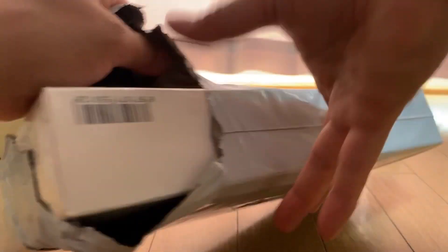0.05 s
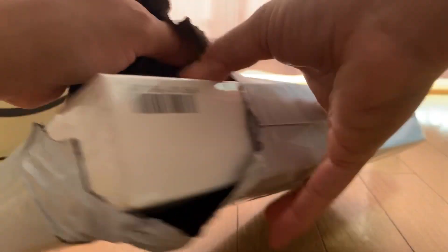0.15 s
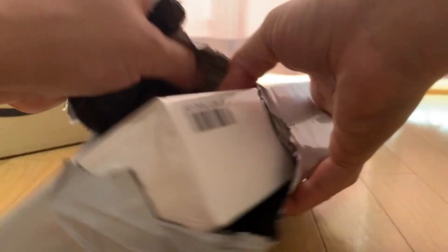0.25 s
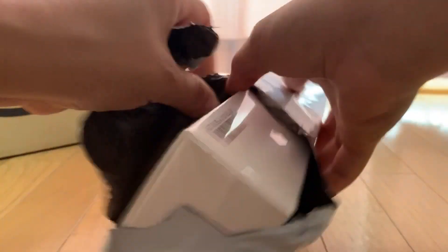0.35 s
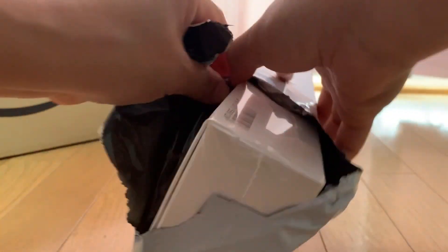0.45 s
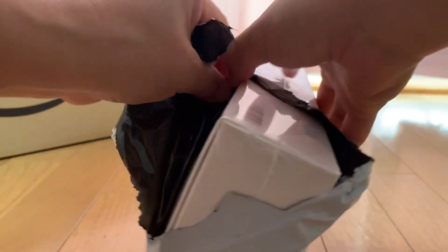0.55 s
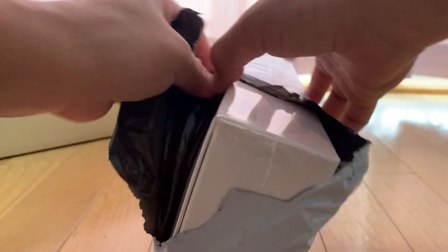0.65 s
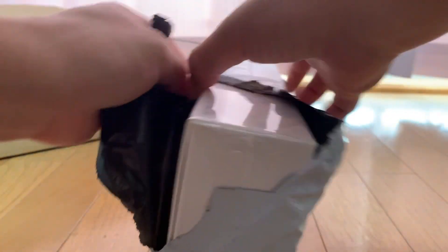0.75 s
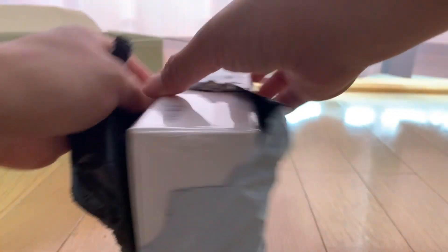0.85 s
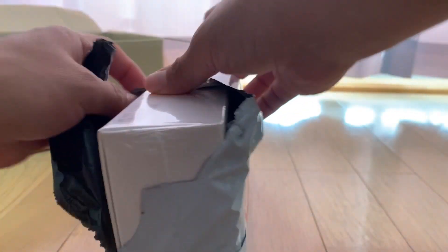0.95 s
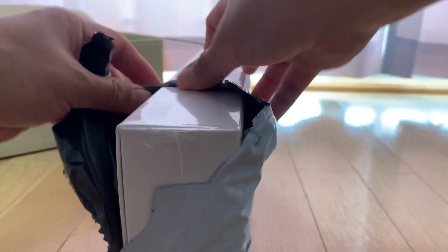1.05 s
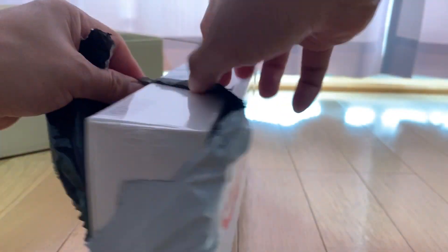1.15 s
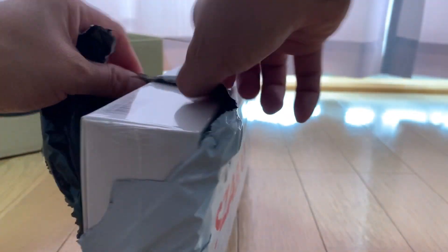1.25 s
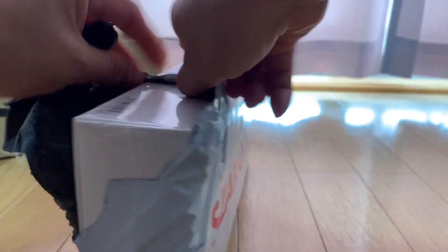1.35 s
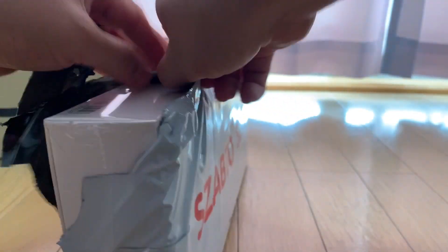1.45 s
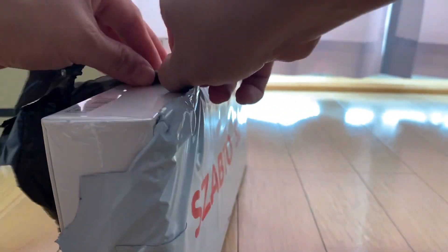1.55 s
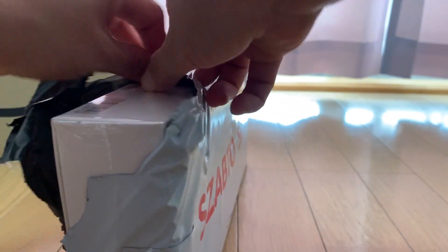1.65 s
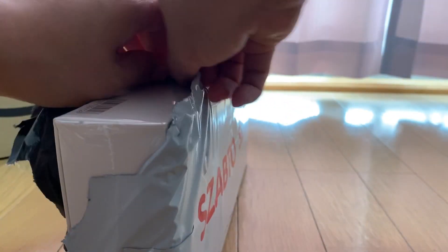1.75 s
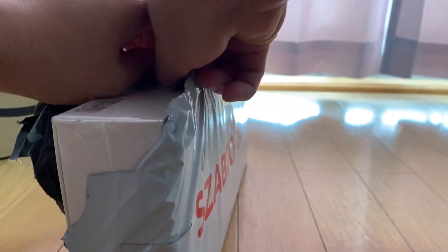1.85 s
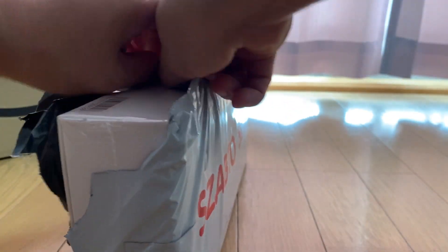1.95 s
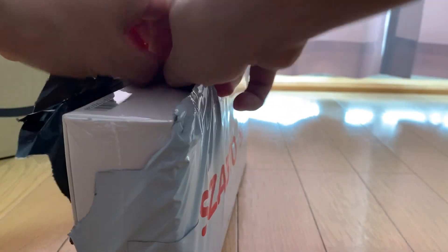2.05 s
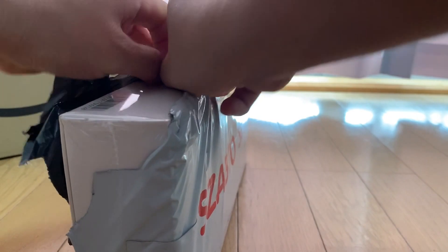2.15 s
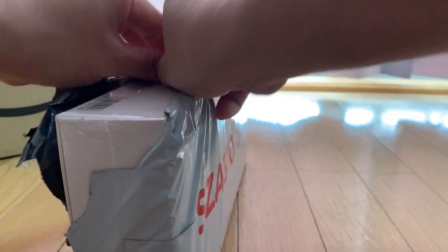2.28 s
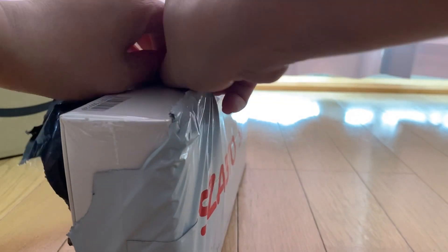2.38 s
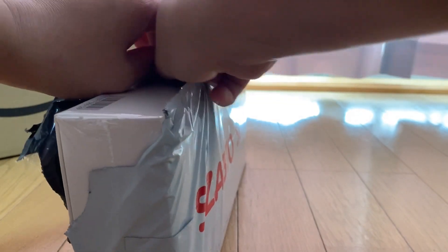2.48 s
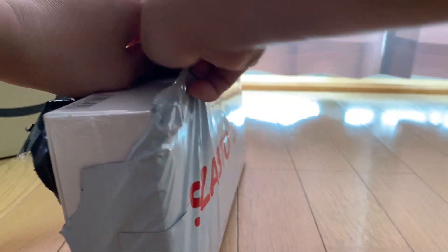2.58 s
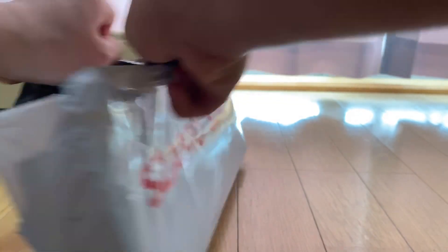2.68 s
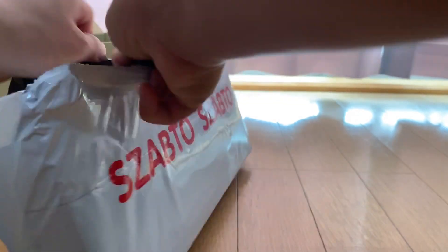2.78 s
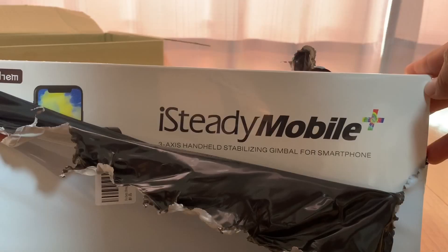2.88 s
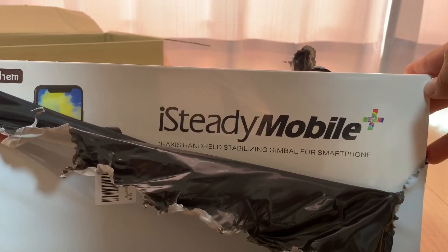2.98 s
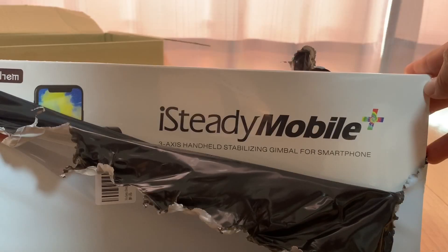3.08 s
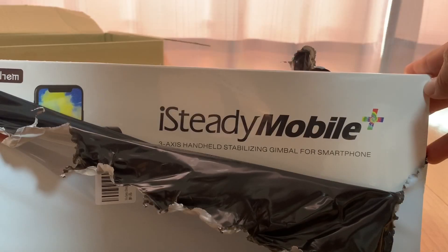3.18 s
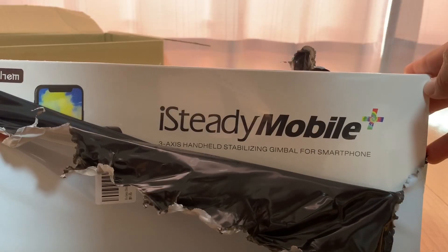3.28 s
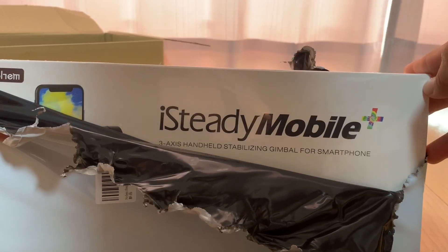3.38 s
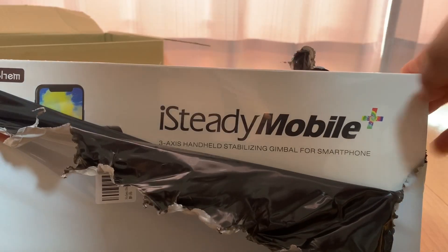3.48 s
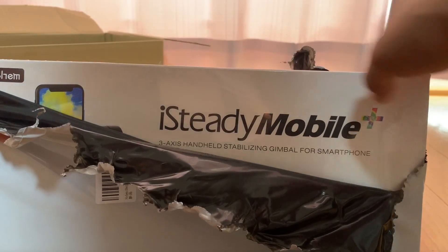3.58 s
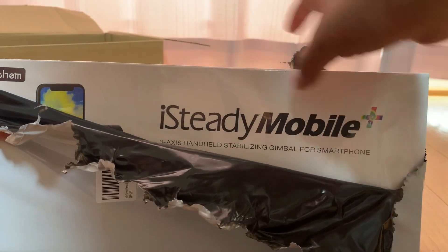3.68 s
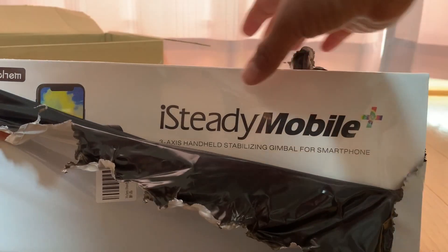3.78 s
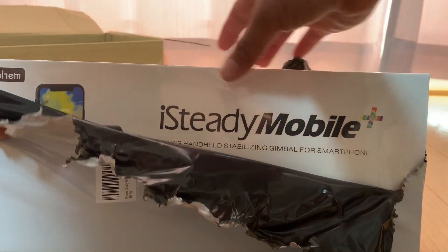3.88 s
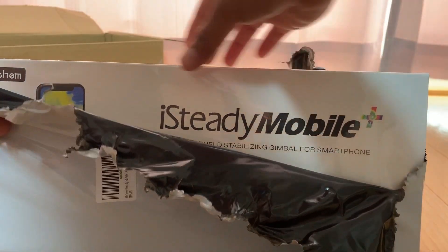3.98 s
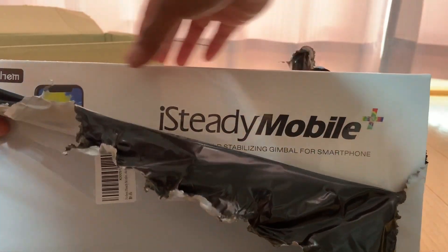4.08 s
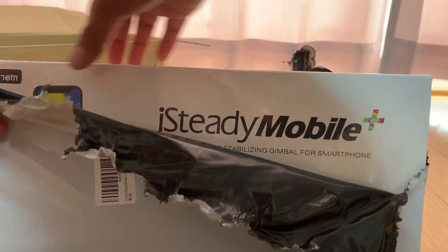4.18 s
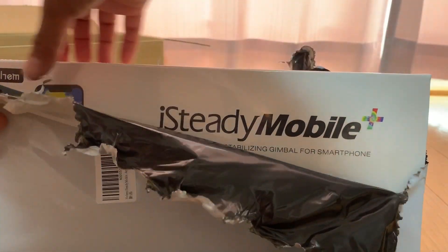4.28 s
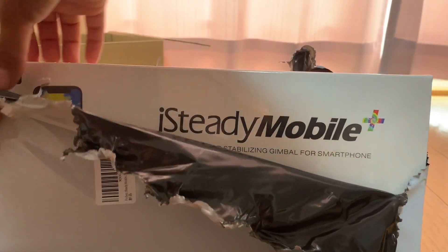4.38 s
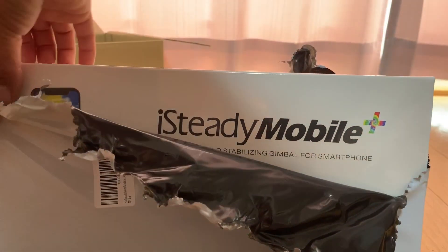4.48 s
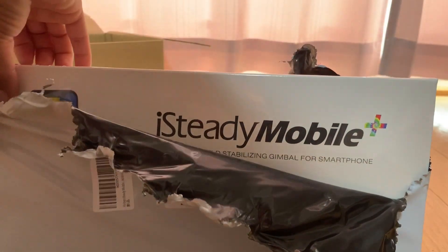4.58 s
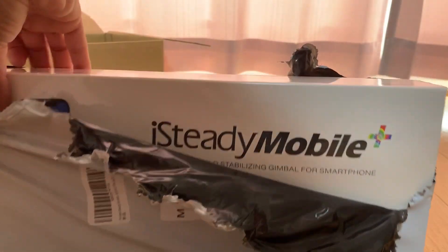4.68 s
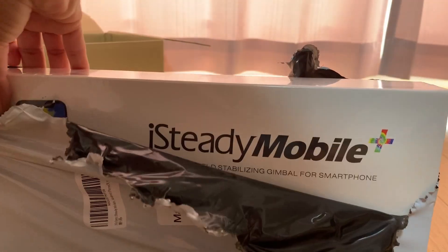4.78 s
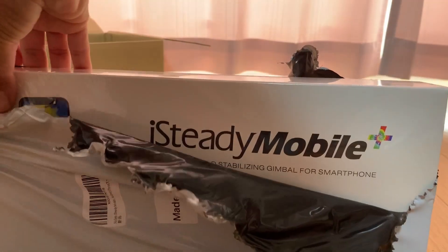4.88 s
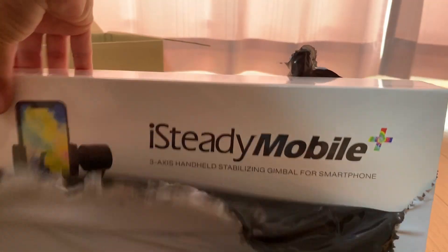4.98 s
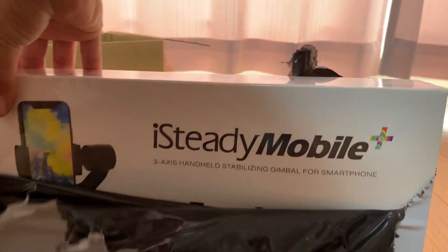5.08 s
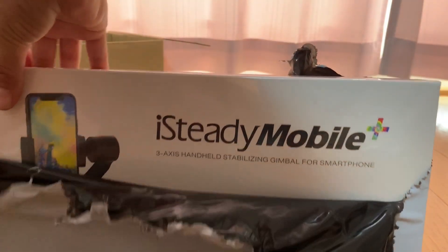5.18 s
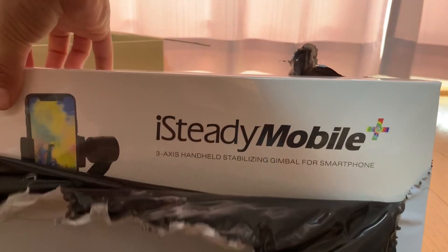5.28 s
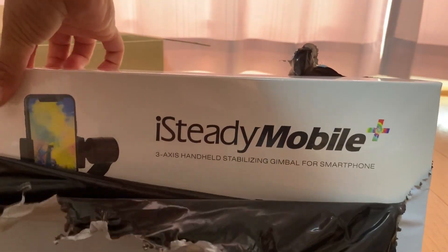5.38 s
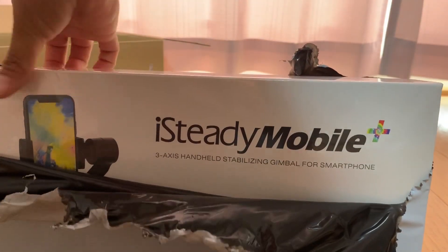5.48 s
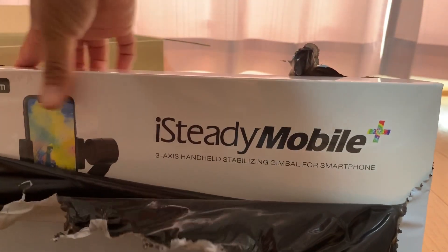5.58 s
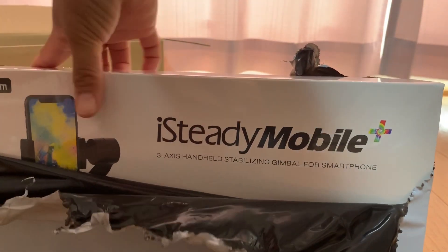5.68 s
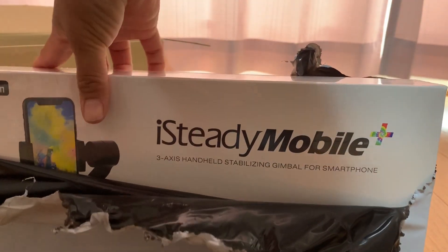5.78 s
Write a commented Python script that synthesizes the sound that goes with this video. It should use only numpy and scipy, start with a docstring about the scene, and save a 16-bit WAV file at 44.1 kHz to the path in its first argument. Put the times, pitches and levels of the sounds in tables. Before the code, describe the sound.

Close stereo microphones in a small, quiet furnished room catch hands pulling a plastic mailing bag off a hollow cardboard box. Sharp snaps, rustles and boxy thumps build to a dense crackling rip, then cut abruptly to near silence. Faint taps return, followed by crinkles and a loud burst of tearing at five seconds, fading to sparse crackles.

```python
"""A cardboard box knocks and hums; then the plastic mailing bag torn off it snaps and rustles, on a wooden floor.
Snaps and scrunches are coloured noise bursts; the rustle is noise gated by countless random folds.
Knocks are sums of decaying box modes; boards rumble and a quiet room hisses underneath.
A splice joins two moments, heard by two close microphones."""
import sys
import numpy as np
from scipy import signal
from scipy.fft import rfft, irfft
from scipy.io import wavfile
from scipy.ndimage import uniform_filter1d

SR = 44100
rng = np.random.default_rng(int(sys.argv[2]) if len(sys.argv) > 2 else 0)


def store_wav(level_fs):
    """Save 16-bit WAV to argv[1]."""
    pcm = np.round(np.clip(np.atleast_2d(level_fs), -1, 1) * 32767)
    wavfile.write(sys.argv[1], SR, pcm.T.astype(np.int16))


N = 257544
SPLICE_S = 2.839


def gain_of(db):
    """Decibels to amplitude."""
    return 10 ** (np.asarray(db) / 20)


def evened(x):
    """Scales to rms 1."""
    return x / np.sqrt(np.mean(x ** 2) + 1e-20)


def response(points, size):
    """Gain at every FFT bin from (Hz, dB) points; drops 26.5 dB outside them."""
    hz, db = np.transpose(points)
    bins_hz = np.fft.rfftfreq(size, 1 / SR)
    return gain_of(np.interp(np.log(bins_hz + 1), np.log(hz + 1), db, left=db[0] - 26.5, right=db[-1] - 26.5))


def noise(points):
    """Two unrelated steady noises of one colour."""
    white = rfft(rng.standard_normal((2, N)))
    return evened(irfft(white * response(points, N), N))


def causal(gain):
    """Minimum phase from the cepstrum: the colour rings only after its cause."""
    cepstrum = irfft(np.log(gain + 1e-5 * gain.max()))
    half = len(cepstrum) // 2
    fold = np.r_[1, np.full(half - 1, 2)]
    return np.exp(rfft(cepstrum[:half] * fold, len(cepstrum)))


def add(mix, start_s, sound):
    """Mixes a sound in at a time."""
    part = mix[..., round(start_s * SR):][..., :sound.shape[-1]]
    part += sound[..., :part.shape[-1]]


# Slow handling, one list per moment. Each row: time in seconds, box hum control in dB, rustle control in dB.
HANDLING = [
    [(0.0, -36.5, -59.5), (.15, -48.5, -75.5), (.25, -43, -52.5), (.36, -41, -42), (.46, -44.5, -61),
     (.72, -58.5, -58.5), (.9, -57, -65.5), (1.08, -48.5, -59), (1.39, -53, -57.5), (1.56, -49.5, -66.5),
     (1.7, -49.5, -55), (1.84, -56.5, -62), (2.18, -50.5, -60.5), (2.4, -62.5, -60.5), (2.55, -58.5, -59),
     (2.67, -44, -54.5), (2.8, -50.5, -69.5)],
    [(2.87, -85, -87.5), (3.05, -75, -91), (3.37, -87, -93.5), (3.49, -50.5, -92), (3.55, -66.5, -85),
     (3.7, -73, -81.5), (3.85, -62, -74.5), (3.95, -56, -55), (4.05, -76, -69), (4.25, -64.5, -73.5),
     (4.46, -57.5, -66), (4.59, -63.5, -71), (4.73, -45.5, -54.5), (4.87, -62, -73.5), (5.0, -32.5, -30.5),
     (5.1, -54, -66), (5.44, -58, -66), (5.64, -64, -60), (5.84, -58.5, -67)],
]


def handling(t):
    """Hum and rustle control levels in dB at times t; they jump at the splice."""
    moments = []
    for rows in HANDLING:
        times_s, hum_db, rustle_db = np.transpose(rows)
        moments.append([np.interp(t, times_s, hum_db), np.interp(t, times_s, rustle_db)])
    return np.where(t < SPLICE_S, *moments)


def flap(hz, width):
    """A loose panel of the bag: one broad resonance as (Hz, dB per Hz) points."""
    return [(hz / width ** 3, -24), (hz / width, -8), (hz, 0), (hz * width, -8), (hz * width ** 3, -22)]


TICKS, TICK_DB, TICK_SPREAD_DB = 120, 10.5, 2.5  # count, least peak over rustle control, exponential spread


def ticks():
    """Rows for small creases at random moments; their peaks follow the rustle control."""
    when, size, low, high, pitch = rng.random((TICKS, 5)).T
    start_s = when * (N / SR - .01)
    peak_db = handling(start_s)[1] + TICK_DB - TICK_SPREAD_DB * np.log(1 - size)
    return list(zip(start_s, peak_db, 12 - 24 * low, 18 * high, 900 * 3 ** pitch))


# Creases that snap. Each row: start in seconds, mid peak in dB, flap over sheet in dB,
# fizz over sheet in dB, flap pitch in Hz.
SNAPS = [(.1917, -28.5, 29, 1, 886), (.2344, -20.5, 4, 13.5, 1670), (.2406, -22, 11, 17, 850),
         (.2534, -20, 4, -12.5, 1120), (.261, -25, -7, 8.5, 1850), (.2805, -24, -4, -1, 1580),
         (.3041, -14, 19, 27.5, 2720), (.3132, -14.5, 8, -4, 2730), (.3216, -25.5, -6.5, 0, 2690),
         (.3634, -16.5, -13, 10, 1210), (.3704, -21, 13.5, -7, 1090), (.4867, -24.5, 4, 19, 2650),
         (.5946, -18, 4, -12.5, 1520), (.624, -33.5, -9.5, 10, 1690), (.6737, -16.5, -30, 3.5, 2690),
         (.7162, -22.5, 11, 12, 1800), (.7336, -30, 4, -5.5, 1100), (.784, -39.5, 19, -3, 890),
         (.8978, -29.5, 30, 32.5, 1820), (.912, -34, 0, -21, 1910), (.9283, -24, -3, 27, 980),
         (.9358, -35, 23, -5, 1060), (.9523, -28, 27, 1, 2800), (1.07, -14.5, 22, -24.5, 1130),
         (1.077, -13.5, 4.5, 7.5, 1220), (1.1739, -32, 40, 21.5, 1290), (1.2115, -26, 2.5, 2.3, 1570),
         (1.2307, -38.5, 23, 6, 960), (1.2605, -27.5, 26, 31, 2650), (1.3119, -29, 9, 17.5, 1500),
         (1.3517, -28.5, 4, -3.3, 1120), (1.4797, -37, 22, 2.1, 1580), (1.4903, -22, 13, 14.5, 1650),
         (1.5149, -12.5, 0.5, 2.6, 1700), (1.6004, -28.5, 30, 23.5, 1270), (1.6388, -27, 13, 26.5, 1680),
         (1.6735, -15, 12.5, 17, 1460), (1.7321, -24.5, 31, 21, 1490), (1.8702, -32.5, 43, 6, 1350),
         (1.8857, -37, 31, -1, 1560), (1.9163, -41.5, 48, 10.5, 1460), (2.0142, -25.5, 8.5, 8, 1140),
         (2.0356, -20, 45, -7, 2540), (2.0384, -16, 6, 14.5, 2490), (2.0585, -20, -15, 22, 2690),
         (2.1776, -35, -10.5, 18.5, 1600), (2.2066, -20.5, -5, 3.5, 980), (2.2887, -37, 12, -4, 990),
         (2.3971, -18, 5.8, 6, 2670), (2.4433, -21.5, 2, 15.5, 2620), (2.5005, -16, -3.5, 29, 2690),
         (2.5937, -29.5, 5, -2.5, 1560), (2.6136, -13, 8, 10, 1710), (2.6355, -8, -14, 16.5, 2690),
         (2.6469, -9, -6, 15.5, 1800), (2.656, -4, -29, 4, 2670), (2.667, -18, -10.5, 12, 1800),
         (2.6746, -6.5, -10, 4, 1720), (2.683, -18, -5, 8, 2680), (2.687, -13, -24, -3, 1710),
         (2.696, -21.5, -15, 4, 2650), (3.071, -66, 6.5, -13, 1500), (3.37, -60, -16, -6, 1480),
         (3.4992, -35.5, 4.5, 11, 1010), (3.5512, -45.5, -12, 13.5, 740), (3.571, -49, 16, 7, 890),
         (3.8993, -27.5, -5, 5.5, 1890), (3.9251, -29.5, 0, 0.5, 1280), (4.187, -49.5, 12, -5, 1180),
         (4.2234, -25, 5, 12, 810), (4.41, -37, 6, 9.5, 734), (4.4952, -32, 8, 21, 1970),
         (4.5861, -25, 13.5, -5, 730), (4.65, -10.5, -10, -0.5, 1870), (4.6735, -17, -26, -7, 1920),
         (4.6777, -17.5, -25, 6.5, 2720), (4.7339, -23, 2, 8, 1830), (4.743, -19, -9, 0.5, 1020),
         (4.7631, -24, -9, -9, 1060), (4.7869, -20, 3, -23, 2600), (4.8528, -36.5, -8, 24, 2780),
         (4.9004, -44, -14.5, 26, 2720), (4.939, -24, -23, -6.5, 1500), (4.9575, -3.5, 17, 22, 1110),
         (4.9613, -2, 33.5, 37, 944), (4.978, -5, 3, -3, 1030), (5.0168, -14.5, 3, 5.5, 1090),
         (5.0582, -22.5, -24, 14.5, 1050), (5.1869, -26, -19, 15.5, 2550), (5.2161, -23, -15.5, -5, 1004),
         (5.2611, -32, 3, 0, 720), (5.325, -39, 2, -24, 1160), (5.3523, -33.5, 3, -12.5, 1830),
         (5.4205, -32.5, -5.5, 41, 1013), (5.7193, -21, -25, 15.5, 2550), (5.7455, -34.5, -17, 12, 2630),
         (5.823, -17.5, -11, 8.5, 1540)]
# Colour of the bag's taut sheet. Each row: frequency in Hz, level in dB per Hz.
SHEET = [(1700, -9.5), (2700, 1), (4000, 4.5), (5800, 3), (7500, -7), (10000, -2.5)]
# Colour of its finest creases. Each row: frequency in Hz, level in dB per Hz.
FIZZ = [(4200, -37.5), (6000, -7.5), (7500, -4.5), (9500, -3), (12000, -3), (15500, -7.5), (17500, -20.5)]
SNAP_T60_S, SNAP_PAN_DB = 0.014, 2.5  # pan is a random spread


def snaps():
    """A crease flips: a crack, a short rattle, then a weak scatter off bag, box and floor."""
    size = 4096
    t, out = np.arange(size) / SR, np.zeros((2, N))
    crack = gain_of(9 - 60 * t / .002)
    rattle = gain_of(-60 * t / SNAP_T60_S)
    scatter = gain_of(-20 - 60 * t / .06)
    shape = (1 - np.exp(-t / .00015)) * (crack + rattle + scatter)
    for start_s, peak_db, flap_db, fizz_db, flap_hz in list(SNAPS) + ticks():
        parts = np.array([response(p, size) for p in (flap(flap_hz, 1.44), SHEET, FIZZ)])
        parts /= np.linalg.norm(parts, axis=1, keepdims=True)
        colour = gain_of([flap_db, 0, fizz_db]) @ parts
        # no two creases ring alike
        ripple = evened(uniform_filter1d(rng.standard_normal(size // 2 + 1), size=120))
        colour *= gain_of(2.2 * ripple)
        burst = irfft(rfft(shape * rng.standard_normal((2, size))) * causal(colour))
        burst *= gain_of(peak_db) / abs(burst[0]).max()
        # nearer one microphone
        pan = np.tanh(SNAP_PAN_DB * rng.standard_normal() * np.log(10) / 40)
        burst[1] = 1.1 * burst[1] + pan * burst[0]
        add(out, start_s, burst)
    return out


def folds(per_s, spread_db, t60_s, bed):
    """Envelope of rms 1: random folds of very uneven size, each swelling and dying fast, over a bed of rubbing."""
    happens = rng.random(N) < per_s / SR
    size = gain_of(spread_db * np.minimum(rng.exponential(1, N), 4)) * happens
    t = np.arange(2000) / SR
    fade = (1 - np.exp(-t / 0.00044)) * gain_of(-60 * t / t60_s)
    power = signal.oaconvolve(size ** 2, fade ** 2)[:N].clip(0)
    return evened(np.hypot(evened(np.sqrt(power)), bed))


# Fold grain of hum, flap, sheet and fizz.
# Each row: folds per second, size spread in dB, t60 in seconds, shared exponent 0-1.
GRAIN = [(65.56, 1.0, 0.026, 0.11), (242, 11.0, 0.01, 0.32), (420, 1.4, 0.015, 0.43), (487, 6.0, 0.0086, 0.34)]


def textures():
    """Countless small folds; one set shakes every part, each part adds its own."""
    shared = folds(350, 6, .012, .6)
    grains = []
    for per_s, spread_db, t60_s, share in GRAIN:
        own = folds(per_s, spread_db, t60_s, 0.71)
        grains.append(evened(shared ** share * own ** (1 - share)))
    return grains


# A hand crushes or drags the bag. Each row: peak time in seconds, length in seconds, level in dB,
# brightness in dB (fizz up, flap down), flap pitch in Hz.
SCRUNCHES = [(0.032, 0.026, -57.5, -16, 435), (0.067, .01, -56.5, 2, 900), (0.265, .03, -52, 3, 1070),
             (0.313, .008, -34.5, -2.5, 1530), (.355, 0.031, -48.5, 6, 1180),
             (0.459, 0.068, -54, 6.5, 2600), (0.601, 0.018, -45, 3, 1560), (0.719, 0.01, -49.5, 10, 1700),
             (.948, 0.044, -56.5, -2.5, 980), (1.033, .012, -47.5, 5, 1750),
             (1.16, 0.044, -51.5, 6.5, 1400), (1.335, 0.037, -48.5, 2, 1080), (1.42, .019, -56, 7, 1500),
             (1.482, .0064, -45, -6.5, 1570), (1.524, .015, -52, -0.5, 1810), (1.59, 0.061, -55, 1.5, 1480),
             (1.672, .018, -54, 1.6, 1620), (1.729, 0.012, -43, -4.5, 1340),
             (1.869, .007, -56.5, -12, 1290), (2.046, 0.021, -46, -0.5, 2540),
             (2.212, .011, -38.5, 3.5, 1030), (2.327, 0.022, -57, 2, 1010), (2.452, .017, -60, 0, 2640),
             (2.515, 0.016, -55, 1.5, 2670), (2.67, .02, -32.5, 0.5, 1704), (2.819, 0.18, -52.5, -3, 929),
             (3.173, .02, -87, -9.5, 1847), (3.356, 0.06, -84, 1.5, 1580), (3.503, 0.017, -62, 4, 893),
             (3.56, .015, -68.5, 3, 964), (3.68, 0.067, -78, -1.2, 2800), (3.796, .01, -68.5, 4, 790),
             (3.915, 0.013, -53, 5, 1250), (3.976, .021, -52, .8, 2450), (4.133, 0.088, -72, -4, 2900),
             (4.232, 0.016, -52, 4, 865), (4.369, .05, -71.5, 1.5, 877), (4.507, 0.031, -62, 6, 1850),
             (4.6, 0.019, -49.5, -4, 645), (4.666, .035, -48, 6, 1960), (4.74, .006, -43, -1.5, 2680),
             (4.801, .03, -54, -2.7, 2800), (4.939, .017, -49, 2, 1820), (4.971, 0.012, -24.5, 2.5, 1870),
             (5.02, 0.036, -45.5, -2, 1050), (5.212, .029, -43.5, 6, 1070), (5.342, 0.0214, -67, 4, 1900),
             (5.436, 0.03, -55, 4, 810), (5.608, .013, -55, -4, 950), (5.726, .008, -57.5, -3.5, 710),
             (5.832, .014, -54.5, 5.5, 1480)]
RISE_SHARE, SCRUNCH_SHEET_DB = 0.91, -4  # rise over fall; sheet relative to level
SHEET_LEAN_DB_PER_DB = 0.55  # a dull squeeze also wakes less of the sheet


def scrunches(texture):
    """Each squeeze swells and fades; its folds ring the flap, the sheet and the creases."""
    out, size = np.zeros((2, N)), 16384
    for peak_s, length_s, db, bright_db, flap_hz in SCRUNCHES:
        at = np.clip(round(peak_s * SR) + np.arange(size) - size // 2, 0, N - 1)
        t = at / SR - peak_s
        span_s = length_s * np.where(t < 0, RISE_SHARE, 1)
        steepness = np.where(t < 0, 2.4, 1.6)  # starts more abruptly than it ends
        swell = gain_of(-4 * abs(t / span_s) ** steepness)
        swell *= (at / SR < SPLICE_S) == (peak_s < SPLICE_S)  # stays within its moment
        white = rfft(rng.standard_normal((3, 2, size)))
        sheet_db = db + SCRUNCH_SHEET_DB + SHEET_LEAN_DB_PER_DB * min(bright_db, 0)
        levels_db = db - bright_db, sheet_db, db + bright_db
        for k, part in enumerate((flap(flap_hz, 1.645), SHEET, FIZZ)):
            ringing = evened(irfft(white[k] * response(part, size)))
            out[:, at] += gain_of(levels_db[k]) * swell * texture[k + 1][at] * ringing
    return out


# Box hum colour. Each row: frequency in Hz, level in dB per Hz.
HUM = [(90, -19), (170, 1), (280, 1), (450, -6), (650, -15.5), (900, -43)]
# Loose flap colour in the steady rustle. Each row: frequency in Hz, level in dB per Hz.
FLAP = [(450, -12), (750, 2), (1100, 2), (1800, 1), (2400, -11.5), (3300, -17)]
# How hum, flap, sheet and fizz follow the handling. Each row: offset in dB, share of the hum control 0-1.
FOLLOW = [(0.36, 0.93), (-3, 0.3), (-1.5, .05), (3, 0.09)]


def rustle(texture):
    """Handling keeps bag and box moving: four noise colours, each gated by its folds."""
    hum_db, rustle_db = handling(np.arange(N) / SR)
    out = np.zeros((2, N))
    for (offset_db, share), grain, part in zip(FOLLOW, texture, (HUM, FLAP, SHEET, FIZZ)):
        level_db = offset_db + share * hum_db + (1 - share) * rustle_db
        out += gain_of(level_db) * grain * noise(part)
    return out


def patchy(x, spread_db):
    """The crumpled sheet keeps changing shape, so its colour drifts in patches."""
    z = signal.stft(x, nperseg=256)[2]
    patches = uniform_filter1d(rng.standard_normal(z.shape[1:]), size=5, axis=0)
    patches = evened(uniform_filter1d(patches, size=14, axis=1))
    power_offset_db = spread_db ** 2 * np.log(10) / 20  # holds the mean power
    return signal.istft(z * gain_of(spread_db * patches - power_offset_db), nperseg=256)[1][:, :N]


# Knocks on the box. Each row: start in seconds, peak in dB, pitch of the squeezed box in Hz,
# hardness in dB per octave of mode ratio, floor board shake in dB.
KNOCKS = [(.028, -28.5, 430, 0, -48.5), (.194, -26.5, 233, -6.5, -47.5), (0.312, -30.5, 285.5, -7.5, -49.5),
          (.373, -4, 265.2, -0.6, -37), (.731, -39, 208, 2, -64), (0.888, -34, 156.5, 9.5, -46.5),
          (0.932, -26.5, 252, 11, -57.5), (1.068, -22.5, 302.5, 6.5, -65), (1.167, -38, 393, 9, -61),
          (1.48, -27.5, 227, 8.5, -55), (1.586, -36, 298, -1, -65), (1.873, -31, 200.8, 4, -45),
          (2.012, -29, 233.6, 10.5, -60), (2.163, -27, 409, -0.7, -51.5), (2.29, -32.5, 221, 8, -60.5),
          (2.442, -41, 294.7, -5.5, -63.5), (2.645, -31.5, 200.7, 3.5, -49),
          (2.744, -27.5, 269.4, .6, -56.5), (3.176, -54, 148.4, -7.5, -54.5),
          (3.444, -50, 145.7, -1.2, -49.5), (3.564, -44, 257, 9.5, -53.5), (4.088, -46.5, 167, -5, -58),
          (4.22, -37.5, 210, 5, -57), (4.583, -19, 274.3, 2, -48), (4.71, -40, 171.4, -0.5, -53.5),
          (4.739, -37.5, 391, -2, -59.5), (4.767, -35.5, 225, 1.5, -62), (4.934, -37.5, 400, -9, -55),
          (4.971, -19, 253.5, -1, -40.5), (5.21, -37.5, 214.5, -6.5, -55), (5.444, -41.5, 191, 0.2, -56.5),
          (5.514, -39.5, 167.5, 8.5, -56), (5.596, -30.5, 260, 5.5, -49.5), (5.718, -40, 264.4, -4, -66)]
# Box modes. Each row: pitch ratio, level in dB, t60 ratio.
BOX = [(.45, -10, 1.8), (.75, -13, 3.26), (1, 4, 0.77), (1.6, -8.5, 0.73), (2.5, -21, 0.38),
       (4.2, -25.5, 0.36)]
KNOCK_T60_S = 0.066  # times the mode's t60 ratio


def knocks():
    """The hollow box rings in its few modes; a hard blow wakes the upper ones."""
    t, out = np.arange(12000) / SR, np.zeros(N)
    for start_s, peak_db, hz, hard_db, _ in KNOCKS:
        ring = np.zeros(len(t))
        for ratio, level_db, long in BOX:
            decay = gain_of(level_db + hard_db * np.log2(ratio) - 60 * t / (KNOCK_T60_S * long))
            rise = (1 - np.exp(-t * hz * np.sqrt(ratio) / .9)) ** 2  # cardboard gives slowly
            # all modes swing together where the blow is deepest
            ring += decay * rise * np.cos(2 * np.pi * ratio * (hz * t - 1.9))
        add(out, start_s, -gain_of(peak_db) * ring / abs(ring).max())
    return out


# Floor board colour. Each row: frequency in Hz, level in dB per Hz.
BOARDS = [(25, -32), (40, -5), (60, -1.5), (95, -4.5), (140, -33.5)]
SHAKE_RISE_S, SHAKE_T60_S, BOARDS_OVER_HUM_DB = 0.023, 0.31, -10


def boards():
    """Low rumble of the floor: the box drags on it, and every knock shakes it."""
    t = np.arange(20000) / SR
    hum_db = handling(np.arange(N) / SR)[0]
    power = gain_of(hum_db + BOARDS_OVER_HUM_DB) ** 2
    shake = (1 - np.exp(-t / SHAKE_RISE_S)) * gain_of(-60 * t / SHAKE_T60_S)
    shake /= shake.max()
    for start_s, *_, shake_db in KNOCKS:
        add(power, start_s, (gain_of(shake_db) * shake) ** 2)
    return np.sqrt(power) * noise(BOARDS)


def room(x):
    """Short faint tail of a furnished room, unrelated in the two signals."""
    t = np.arange(12000) / SR
    tail = rng.standard_normal((2, 12000)) * gain_of(-60 * t / .22) * (t > .006)
    tail /= np.linalg.norm(tail[0])
    return gain_of(-18) * signal.oaconvolve(x, tail, axes=1)[:, :x.shape[1]]


# Quiet room colour. Each row: frequency in Hz, level in dB per Hz.
AIR = [(22, -38.5), (38, -3.5), (54, -16), (86, -5), (98, -10.5), (114, -10), (292, -22.5), (499, -56),
       (790, -39.5), (1070, -53.5), (1500, -55.5), (2900, -58.5), (15200, -58.5), (16900, -69)]
AIR_DB = -57


def air():
    """Steady noise of the quiet room."""
    return gain_of(AIR_DB) * noise(AIR)


# Stereo width. Each row: frequency in Hz, side over mid in dB before the path weights.
WIDTH = [(60, -16.5), (99, -18), (160, -16), (270, -17), (450, -9.5), (740, -2.5), (1220, -11.5),
         (2010, -2.5), (3330, -2.5), (5500, -2.5), (9080, -16.5), (15000, -5.5)]


def spaced_pair(mid, other):
    """Two microphones hear each sound a little apart in phase, and partly by other paths."""
    before = np.arange(N) < round(SPLICE_S * SR)
    lag = np.where(before, -.7, .25)  # the hands work to the right, then to the left
    quarter_turn, other_path = irfft(response(WIDTH, N) * rfft([mid, other]) * [[1j], [1]], N)
    side = lag * quarter_turn + 1.29 * other_path
    side += .13 * signal.lfilter(*signal.butter(1, 400, fs=SR), mid)  # the bass leans left
    return np.array([mid + side, mid - side])


def scene():
    """Snaps and knocks with room tails, over rustle, scrunches, boards and air."""
    texture, events = textures(), snaps()
    events[0] += knocks()
    cut = round(SPLICE_S * SR)
    # room tails stop at the splice
    events = np.hstack([part + room(part) for part in (events[:, :cut], events[:, cut:])])
    plastic = patchy(rustle(texture) + scrunches(texture), 2.77)
    mid, other = events + plastic + boards() + air()
    return spaced_pair(mid, other)


DULL_HZ, EDGE_HZ = 15800, 17000


def record(dry):
    """Microphones drop the deepest bass; treble slopes down, falls past DULL_HZ and stops at EDGE_HZ."""
    cut = signal.sosfilt(signal.butter(4, 36, "high", fs=SR, output="sos"), dry)
    shelf = signal.firwin2(511, [0, DULL_HZ, DULL_HZ + 300, SR / 2], [0.97, 0.55, 0.1, 0.1], fs=SR)
    edge = signal.firwin(511, EDGE_HZ, window=("kaiser", 9), fs=SR)
    return signal.oaconvolve(cut, np.convolve(shelf, edge)[None], "same")


dry = scene()
out = record(dry)
store_wav(out)
```